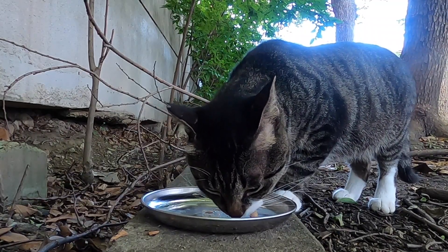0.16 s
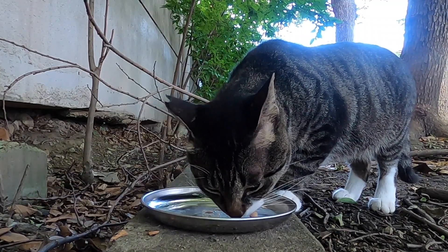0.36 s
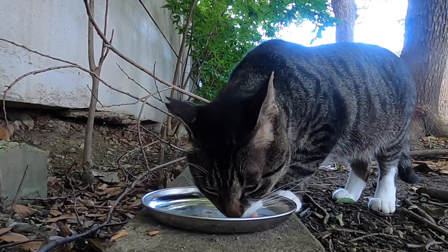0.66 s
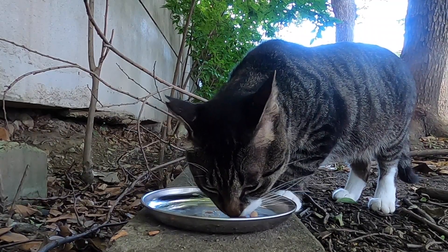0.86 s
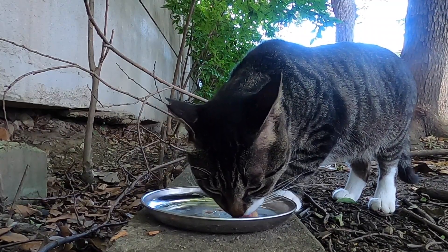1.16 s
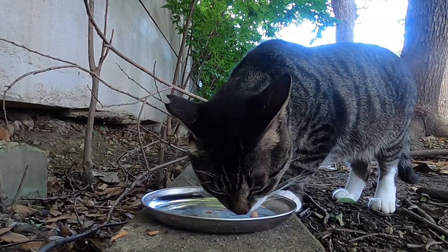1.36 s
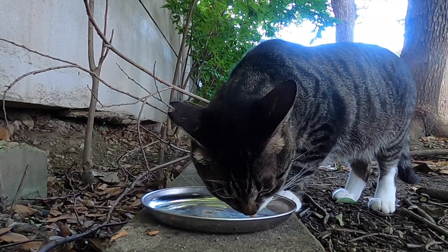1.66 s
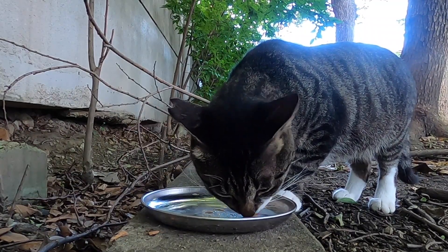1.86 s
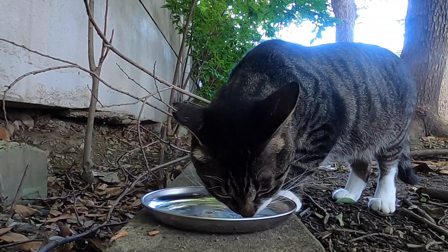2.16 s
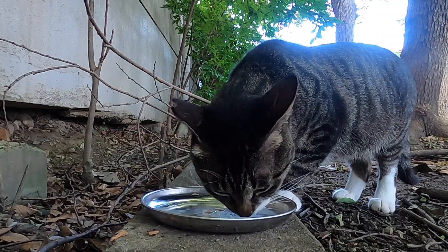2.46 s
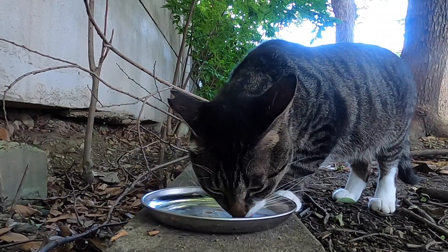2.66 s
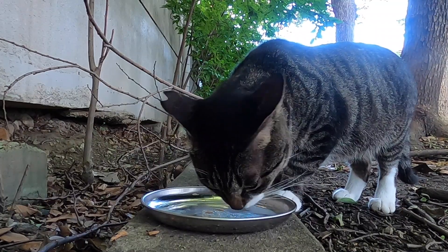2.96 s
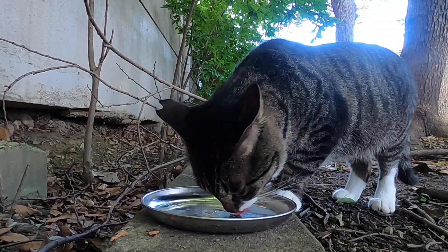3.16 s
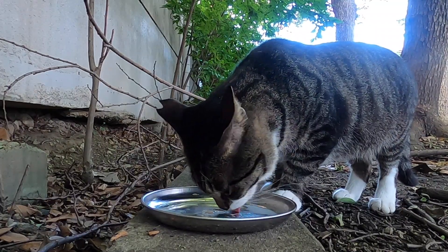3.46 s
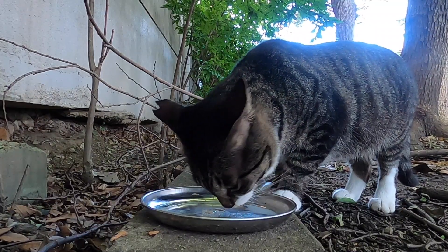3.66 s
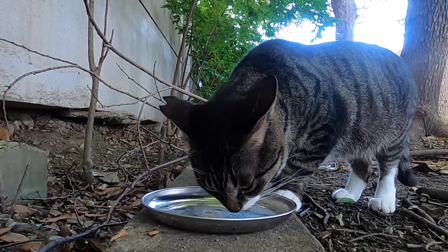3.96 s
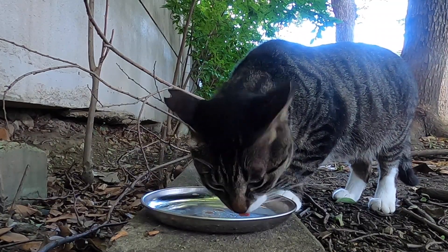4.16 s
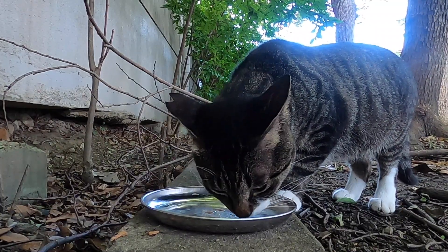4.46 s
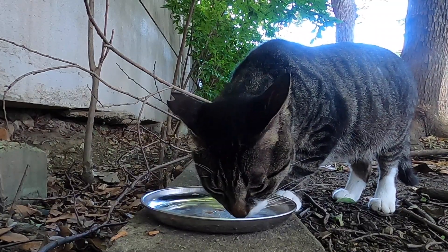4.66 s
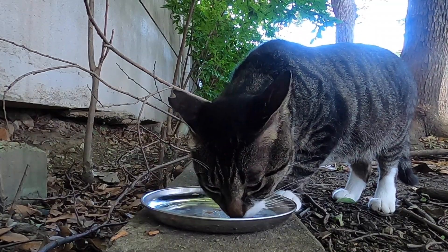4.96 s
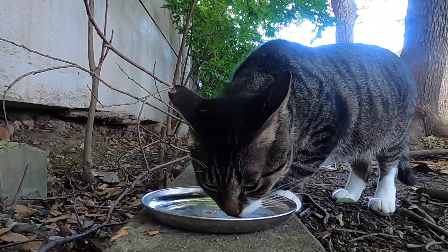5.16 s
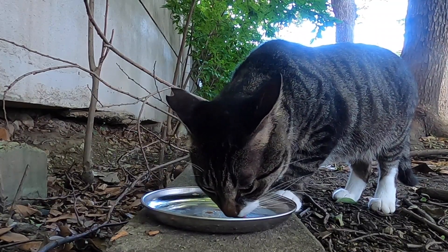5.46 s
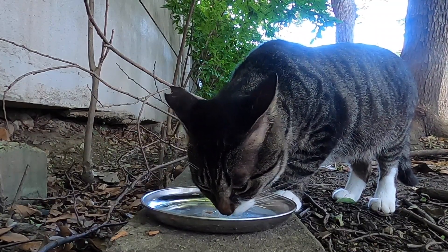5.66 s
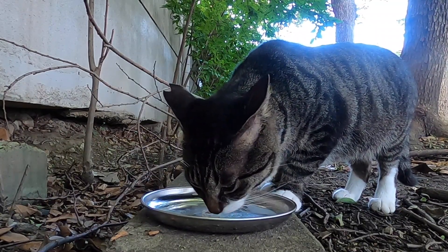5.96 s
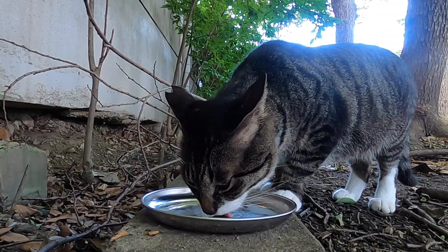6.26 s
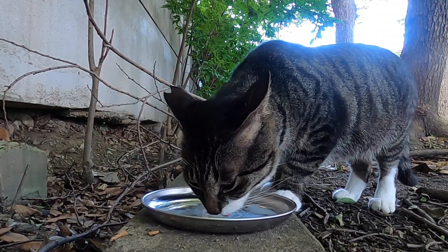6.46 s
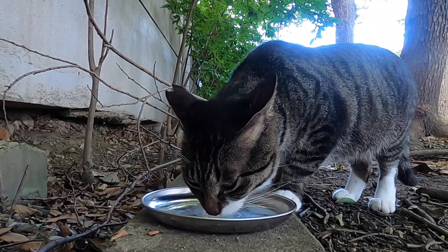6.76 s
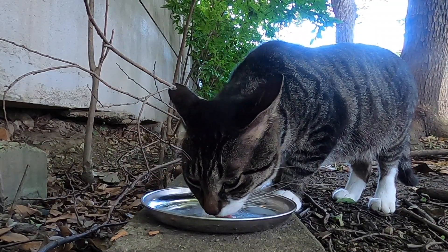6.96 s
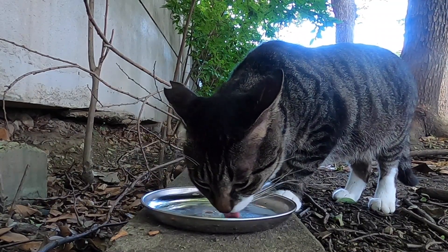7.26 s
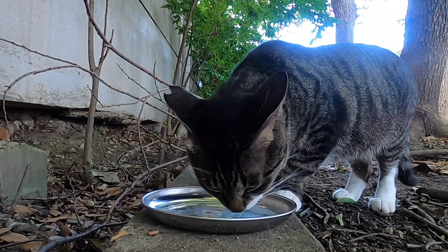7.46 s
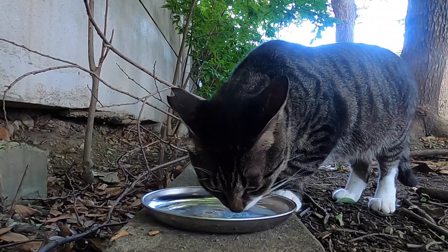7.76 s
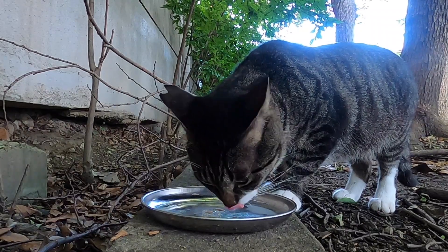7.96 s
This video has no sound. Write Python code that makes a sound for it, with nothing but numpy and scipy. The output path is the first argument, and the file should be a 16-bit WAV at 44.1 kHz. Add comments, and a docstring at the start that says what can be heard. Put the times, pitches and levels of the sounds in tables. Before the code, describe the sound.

A continuous low traffic rumble dominates, uneven and pulsing with heavy vehicles, with a muffled mid-range tyre wash above it, slightly stronger on the left. One passing car fades out by the middle, then a distant vehicle pulls away with a blurred low hum. Thin far squeals are almost hidden. Near the stereo microphones outdoors, sparse faint scratchy clicks come from a cat's tongue on a metal dish, more often toward the end.

```python
"""A deep steady rumble and the roar of far tyres: city traffic heard from a sheltered yard.
One car's hiss recedes in the first seconds; a far engine drones up in the second half.
Close to the microphones a cat faintly licks a steel dish.
Traffic is shaped noise plus wavering tones; each lick is a burst of ticks through steel resonances."""
import sys
import numpy as np
from scipy import signal
from scipy.fft import rfft, irfft, next_fast_len
from scipy.io import wavfile
from scipy.ndimage import uniform_filter1d, map_coordinates

SR = 44100
rng = np.random.default_rng(int(sys.argv[2]) if len(sys.argv) > 2 else 0)


def master_out(mix):
    """Clip the mix to full scale and print it as 16-bit PCM to the path in sys.argv[1]."""
    frames = np.transpose(np.atleast_2d(mix))
    ceiling = np.clip(frames, -1, 1)
    pcm = np.round(ceiling * 32767).astype(np.int16)
    wavfile.write(sys.argv[1], SR, pcm)


N = 357651


def amp(db):
    """Decibels to gain."""
    return 10 ** (np.asarray(db) / 20)


def unit(x):
    """Scaled to rms 1."""
    return x / np.sqrt(np.mean(x ** 2) + 1e-20)


def along(points, hz):
    """(Hz, value) points read on a log axis."""
    f, v = np.transpose(points)
    return np.interp(np.log(hz + 1), np.log(f + 1), v)


def curves(rows):
    """One value per sample for each column after the time."""
    s, *cols = np.transpose(rows)
    return [np.interp(np.arange(N) / SR, s, c) for c in cols]


def wobble(knots_per_s):
    """A smooth random curve through normally distributed knots."""
    knots = rng.standard_normal(int(N * knots_per_s / SR) + 4)
    return map_coordinates(knots, [np.arange(N) * knots_per_s / SR])


def swell(centre_s, length_s):
    """A bell-shaped envelope, down to exp(-2) at length_s either side of its centre."""
    return np.exp(-2 * ((np.arange(N) / SR - centre_s) / length_s) ** 2)


def filtered(x, response):
    """x through a complex response, given as a function of frequency in Hz."""
    m = next_fast_len(N + SR // 2)
    spectrum = rfft(x, m) * response(np.fft.rfftfreq(m, 1 / SR))
    return irfft(spectrum, m)[..., :N]


def even(x, seconds):
    """x with its chance swells slower than seconds evened out."""
    power = uniform_filter1d(np.mean(x ** 2, axis=0), size=max(int(seconds * SR), 8))
    return x / np.sqrt(np.abs(power) + 1e-9)


def rush(spectrum, patchy_db):
    """Street noise with drifting patches of gain, as the two microphones get it."""
    # Each row: frequency in Hz, likeness between the microphones (0 to 1).
    alike = [(60, 1), (200, .99), (350, 0.96), (520, 0.95), (900, 0.85), (1400, 0.84), (2000, .69),
             (3000, .72), (4200, .45), (5200, .1), (10000, .05)]
    # Each row: frequency in Hz, left minus right in dB.
    tilt = [(30, 2.5), (90, 2), (170, 1), (350, 2), (700, 1.3), (1250, 3), (2000, 3), (2700, 4.7),
            (4000, 4), (5800, 1), (7000, 5), (8200, 5), (9400, -2), (10200, -0.5), (13000, -2)]
    # Each row: frequency in Hz, phase lead of the left in radians.
    lead = [(30, 0.18), (90, -0.12), (200, -0.098), (450, -0.26), (1000, -0.39), (1800, -0.82),
            (3000, -.93), (5000, -0.11)]
    z = signal.stft(rng.standard_normal((2, N)), nperseg=1024)[2]
    field = uniform_filter1d(rng.standard_normal(z.shape[1:]), size=4, axis=0)
    field = uniform_filter1d(field, size=16, axis=1)
    pair = signal.istft(z * amp(patchy_db * unit(field)), nperseg=1024)[1][:, :N]

    def mid_side(hz):
        # long waves reach both microphones alike, short ones do not
        turn = np.arccos(np.clip(along(alike, hz), -1, .9995)) / 2
        return amp(along(spectrum, hz)) * [np.cos(turn), np.sin(turn)]

    half = np.array([[.5], [-.5]])

    def left_right(hz):
        # mostly louder and later at the left
        return amp(half * along(tilt, hz)) * np.exp(1j * half * along(lead, hz))

    mid, side = filtered(pair, mid_side)
    ears = filtered(np.array([mid + side, mid - side]), left_right)
    return ears / np.std(ears.mean(axis=0))


def blurred(phase, smear_rad):
    """A tone over many paths of changing length: its level flutters and its phase wanders."""
    flutter, slow_over_fast = .4, 1.6
    wander = smear_rad * (wobble(22) + slow_over_fast * wobble(5))
    return unit(1 + flutter * wobble(20)) * np.sin(phase + wander)


def rumble():
    """Heavy engines merge into a deep rumble that slowly ebbs; lighter ones into a steady low wash."""
    # Heavy engines. Each row: frequency in Hz, relative spectral level in dB.
    deep_spectrum = [(8, -36.5), (16, -10.5), (33, 1), (42, .5), (52, 0), (62, -4.5), (76, -13),
                     (100, -22.5), (150, -48), (400, -120)]
    # Lighter engines. Each row: frequency in Hz, relative spectral level in dB.
    wash_spectrum = [(35, -15.5), (52, -3), (64, 1.5), (80, 4), (100, 1.5), (130, -1), (160, -1.5),
                     (220, -4), (290, -8), (400, -11), (520, -17.5), (700, -24.5), (1500, -120)]
    # Lighter engines. Each row: time in seconds, level in dB.
    wash_levels = [(0, -29.5), (1.8, -28.5), (2.8, -30), (3.9, -30), (5.1, -29.5), (6.4, -30), (7.3, -29.5),
                   (8.1, -29)]
    start_db, ebb_db_per_s = -24.5, 0.5
    deep_db = start_db - ebb_db_per_s * np.arange(N) / SR
    # so many engines overlap that longer swells even out
    deep = amp(deep_db) * even(rush(deep_spectrum, patchy_db=-2.5), seconds=.16)
    wash_db, = curves(wash_levels)
    wash = amp(wash_db) * even(rush(wash_spectrum, patchy_db=1.0), seconds=.25)
    return deep + wash


def surges():
    """Each heavy vehicle swells up as a throbbing band of noise round its own exhaust note."""
    # Each row: centre in seconds, swell length in seconds, note in Hz, level in dB.
    vehicles = [(0.3, 0.24, 145, -34.5), (0.38, 0.21, 62.03, -24.5), (0.522, 0.13, 44, -21),
                (0.88, .2, 44, -23.5), (1.095, 0.089, 52, -22.5), (1.27, 0.21, 60, -23.5),
                (1.557, 0.14, 38, -25.5), (1.85, 0.18, 155, -33.5), (2.05, 0.13, 49, -22),
                (2.313, 0.19, 43, -21), (2.72, 0.2, 49, -23.5), (2.922, 0.18, 340.5, -42.5),
                (3.13, 0.19, 44, -21.5), (3.332, 0.077, 42, -22.5), (3.475, 0.079, 42, -20),
                (3.724, 0.13, 38, -25), (3.945, 0.11, 45, -19), (4.24, 0.17, 40, -24),
                (4.26, .2, 529, -43.5), (4.388, 0.092, 62, -24.5), (4.648, 0.12, 39, -20),
                (4.947, 0.099, 34, -20.5), (5.267, 0.24, 60, -26), (5.34, .17, 36, -25.5),
                (5.68, .16, 158.1, -35), (5.82, 0.16, 30, -24.5), (6.207, 0.21, 48, -23),
                (6.56, .13, 58.87, -26.5), (6.68, .14, 39.1, -21), (7.27, 0.19, 68, -26),
                (7.473, 0.12, 47, -24.5), (7.62, 0.11, 84, -29)]
    throb_knots_per_s, left_minus_right_db = 42, 2.2
    t = np.arange(N) / SR
    pair = np.array([wobble(throb_knots_per_s), wobble(throb_knots_per_s)])
    a, b = even(pair, seconds=.06)  # longer beats even out
    throb, wander = np.hypot(a, b), np.arctan2(b, a)
    notes = 0
    for s, length_s, hz, db in vehicles:
        notes += amp(db) * swell(s, length_s) * np.sin(2 * np.pi * hz * t + wander)
    return throb * notes * amp(left_minus_right_db * np.array([[.5], [-.5]]))


def tyres():
    """Far tyres roar near 1 kHz, a few cars pass among them, and a nearer one recedes."""
    # Each row: time in seconds, steady roar level in dB, passing cars level in dB.
    traffic = [(0, -37, -43), (1.5, -36.5, -45), (2.4, -37.5, -43), (3.2, -37.5, -41.5),
               (4.3, -38.5, -42.5), (5.1, -38.5, -46.5), (6.5, -38, -57), (8.1, -37.5, -61.5)]
    # Receding car. Each row: time in seconds, hiss level in dB.
    car = [(0.1, -56), (.45, -55), (1.15, -57), (2, -59.5), (2.4, -68), (3, -65.5), (3.7, -77.5),
           (8.1, -89)]
    # Three spectra. Each row: frequency in Hz, relative spectral level in dB.
    roar_spectrum = [(100, -56.5), (380, -12), (510, 0), (610, -3), (820, -2.5), (960, -0.5), (1380, -5),
                     (1620, -9), (1950, -14.5), (3200, -21.5), (4200, -27), (5200, -34), (6000, -37),
                     (7900, -47), (9000, -47), (12000, -68.5), (16000, -120)]
    tread_spectrum = [(300, -40), (520, 1.5), (620, -8), (820, -4), (910, 0.5), (1020, 1), (1250, -7.5),
                      (1550, -17.5), (2400, -37.5), (5000, -120)]
    hiss_spectrum = [(500, -39), (1400, 6.5), (2200, 0.5), (4400, 2.5), (6000, -3.5), (7900, -13),
                     (8900, -11), (10300, -16), (11500, -24), (13500, -25.5), (16000, -58.5)]
    roar_db, passing_db = curves(traffic)
    roar = amp(roar_db + 0.18 * wobble(7)) * rush(roar_spectrum, patchy_db=1.14)
    passing = amp(passing_db) * rush(tread_spectrum, patchy_db=1)
    # air soaks up the treble, so only the nearer car hisses
    hiss_db, = curves(car)
    hiss = amp(hiss_db) * rush(hiss_spectrum, patchy_db=1.5)
    return roar + passing + hiss


def passing_car():
    """The tyres of one car sing in a broad band that sinks in pitch as it goes by."""
    # Each row: time in seconds, band centre in Hz, level in dB.
    going_by = [(0, 1330, -48), (.7, 1310, -45.5), (1.8, 1230, -48.5), (3.2, 1151, -46), (4.2, 1018, -45),
                (4.9, 950, -51.5), (5.6, 920, -66)]
    band_knots_per_s, left_minus_right_db, side_over_mid = 330, 1, 0.31
    centre_hz, level_db = curves(going_by)
    phase = 2 * np.pi * np.cumsum(centre_hz) / SR

    def band():
        return wobble(band_knots_per_s) * np.sin(phase) + wobble(band_knots_per_s) * np.cos(phase)

    mid, side = band(), band()
    ears = np.array([[1], [-1]])
    return amp(level_db + ears * left_minus_right_db / 2) * unit(mid + ears * side_over_mid * side)


def engine():
    """A far vehicle pulls away: a low exhaust growl and a slowly sinking hum, blurred by street echoes."""
    # Exhaust growl. Each row: time in seconds, level in dB.
    growl_levels = [(4.8, -68), (5.4, -54), (5.7, -50), (6.3, -36), (6.8, -48), (7.4, -41.5), (8.1, -39)]
    # Exhaust growl. Each row: frequency in Hz, relative spectral level in dB.
    growl_spectrum = [(50, -58.5), (88, -2), (135, -18), (220, 1.5), (290, -7), (360, -2.5), (460, -10),
                      (700, -37.5), (1500, -120)]
    # Each row: time in seconds, firing rate in Hz, hum level in dB before the orders' own.
    hum = [(5, 53.64, -54), (5.3, 52.87, -43), (5.75, 52.1, -45), (6.2, 51.7, -38.5), (6.55, 51.77, -42),
           (7.1, 51.36, -40.5), (7.6, 50.96, -45), (8.1, 50.76, -44)]
    # Each row: multiple of the firing rate, level in dB relative to the hum.
    orders = [(4, -3), (6, 0), (7, -3)]
    # Louder exhaust notes out of the hum.
    # Each row: centre in seconds, pitch there in Hz, glide in Hz per s, swell length in seconds,
    # level in dB before the ear gains.
    drones = [(5.646, 378.8, 129, 0.17, -36), (6.271, 367.7, -31, 0.18, -35.5), (6.194, 292, 20, 0.15, -36),
              (6.531, 209, 44, 0.14, -30.5), (6.598, 243.4, 0, .17, -32), (6.91, 59, 0, 0.15, -20),
              (7.28, 228, 45.5, 0.22, -32.5), (7.501, 199.6, 0, 0.081, -29), (7.87, 242.3, 29, 0.24, -33),
              (7.92, 208, -19, .16, -36.5)]
    waver_rad, waver_knots_per_s = 0.44, 12
    growl_db, = curves(growl_levels)
    growl = amp(growl_db) * rush(growl_spectrum, patchy_db=3.5)
    t = np.arange(N) / SR
    firing_hz, hum_db = curves(hum)
    firing_phase = 2 * np.pi * np.cumsum(firing_hz) / SR
    harmonics = sum(amp(db) * blurred(round(k) * firing_phase, smear_rad=0.32) for k, db in orders)
    notes = amp(hum_db) * harmonics
    waver = waver_rad * wobble(waver_knots_per_s)
    for s, hz, glide_hz_per_s, length_s, db in drones:
        cycles = hz * (t - s) + .5 * glide_hz_per_s * (t - s) ** 2
        tone = blurred(2 * np.pi * cycles + waver, smear_rad=0.45)
        notes += amp(db) * swell(s, length_s) * tone
    # left and right gains in dB
    return growl + notes * amp([[.9], [-.9]])


def squeal():
    """Thin far squeals, perhaps brakes: tones in short bursts, their pitch smeared by echoes."""
    # Each row: centre in seconds, pitch in Hz, swell length in seconds, level in dB.
    bursts = [(2.545, 5400, .035, -69.5), (2.71, 5380, .04, -68.5), (2.79, 5405, .03, -72),
              (2.96, 5435, .025, -69.5), (5.72, 1433, 0.1, -53), (6.3, 1430, .1, -52),
              (6.65, 908, .09, -48), (7.17, 1430, .11, -53)]
    t = np.arange(N) / SR
    tones = 0
    for s, hz, length_s, db in bursts:
        tones += amp(db) * swell(s, length_s) * np.sin(2 * np.pi * hz * t + .7 * wobble(70))
    return tones


def drip():
    """Tiny bubbles ring as the tongue leaves the wet dish: one small chirp inside a strong lick."""
    # Each row: bubble pitch in Hz, level in dB.
    bubbles = [(5200, -68), (5900, -73), (7650, -75)]
    t = np.arange(N) / SR
    chirp = sum(amp(db) * np.sin(2 * np.pi * hz * t + wobble(250)) for hz, db in bubbles)
    return swell(centre_s=7.147, length_s=.018) * chirp


def licks():
    """The tongue's barbs rasp the dish: each stroke is an uneven clump of tiny ticks that ring the steel."""
    # Each row: centre in seconds, level in dB, swell length in seconds, treble lift in dB.
    strokes = [(0.498, -65.5, 0.011, -0.5), (1.107, -65.5, 0.02, 0.5), (4.203, -74.5, .035, -6),
               (4.912, -74, .04, -6), (6.046, -71.5, .04, -2), (6.358, -70.5, .025, -1.5),
               (6.41, -68.5, .045, -0.5), (6.778, -68, .042, 1), (6.934, -72.5, 0.012, -3),
               (7.147, -66.5, 0.031, 0.5), (7.498, -77, .025, -2.5), (7.83, -71, .035, -1.5)]
    # Each row: frequency in Hz, relative level of the bare ticks in dB.
    tongue = [(1500, -19), (3500, -4), (5500, 5), (7500, -4), (9500, -7), (12500, -9), (14000, -14.5)]
    # Wet steel resonances. Each row: frequency in Hz, width in Hz, relative level in dB.
    dish = [(5200, 180, 0), (5900, 200, 4.5), (6850, 250, -0.5), (7650, 250, 0), (9100, 300, 0),
            (10200, 250, -5.5)]
    grip_db, grip_knots_per_s, barbs_per_s = 3.6, 300, 3200
    treble_hz = 8000  # a wetter stroke is brighter above this
    tail_t60_s, tail_db = .12, -8

    def tongue_on_steel(f):
        steel = sum(amp(db) * 1j * f * w / (hz * hz - f * f + 1j * f * w) for hz, w, db in dish)
        return amp(along(tongue, f)) + steel

    grip = unit(amp(grip_db * wobble(grip_knots_per_s)))  # the tongue catches and slips
    hits = rng.random(N) < barbs_per_s / SR
    # common polarity plus a little that differs between the ears
    kicks = np.sign(rng.standard_normal(N)) + .3 * rng.standard_normal((2, N))
    ticks = unit(filtered(grip * hits * kicks, tongue_on_steel))
    treble = filtered(ticks, lambda f: 1 - 1 / (1 + (f / treble_hz) ** 10))
    rasp = 0
    for s, db, length_s, lift_db in strokes:
        rasp += amp(db) * swell(s, length_s) * (ticks + (amp(lift_db) - 1) * treble)
    # scatter off wall and ground
    t = np.arange(SR // 4) / SR
    tail = amp(-60 * t / tail_t60_s) * rng.standard_normal((2, len(t)))
    scatter = signal.fftconvolve(rasp, tail / np.linalg.norm(tail[0]), axes=1)[:, :N]
    return rasp + amp(tail_db) * scatter


def scene():
    """The street behind, the cat in front."""
    street = rumble() + surges() + tyres() + passing_car() + engine() + squeal()
    return street + drip() + licks()


def record(dry):
    """Band limit: nothing passes from 14 kHz up."""
    return filtered(dry, lambda hz: hz < 14000)


dry = scene()
out = record(dry)
master_out(out)
```